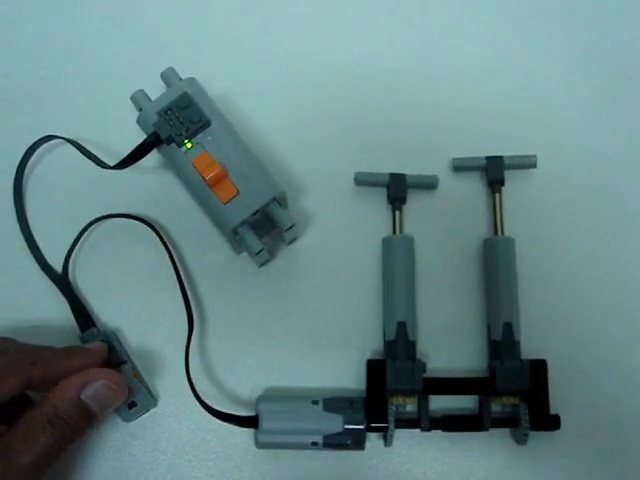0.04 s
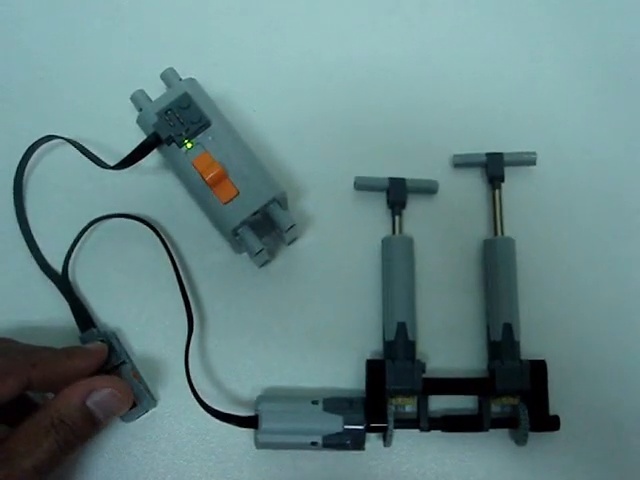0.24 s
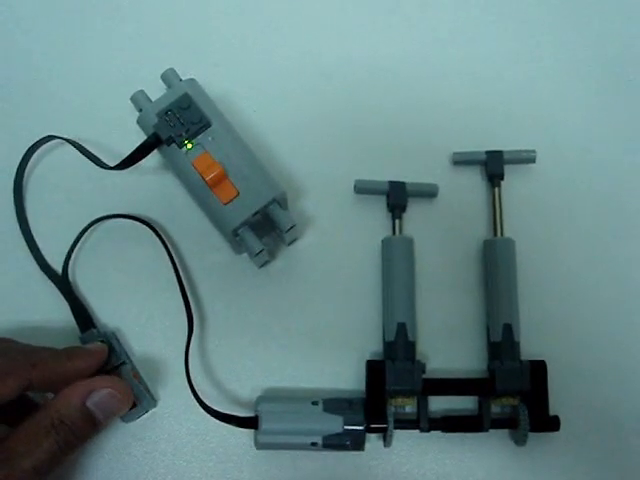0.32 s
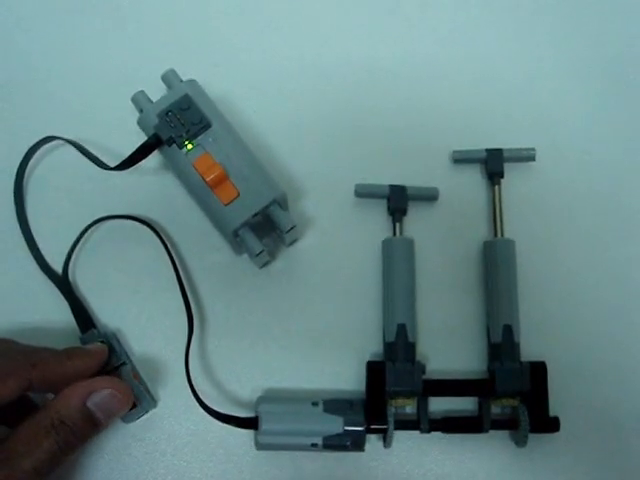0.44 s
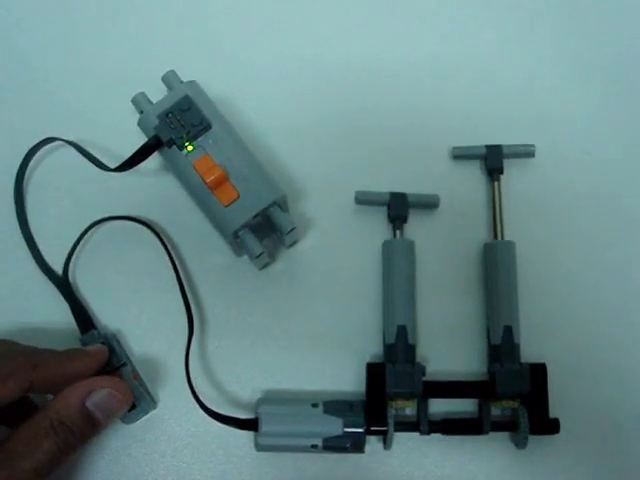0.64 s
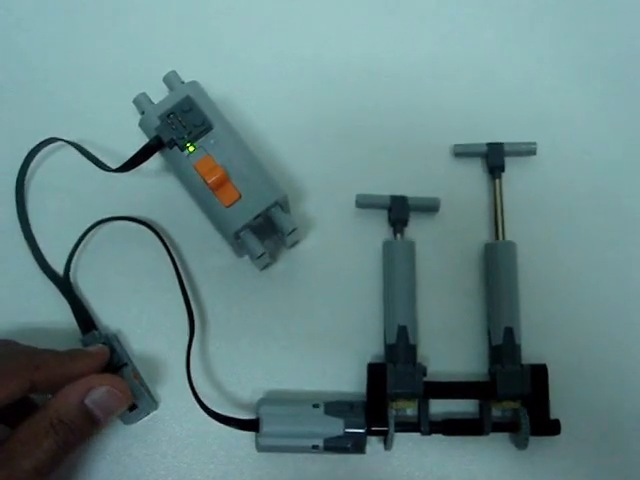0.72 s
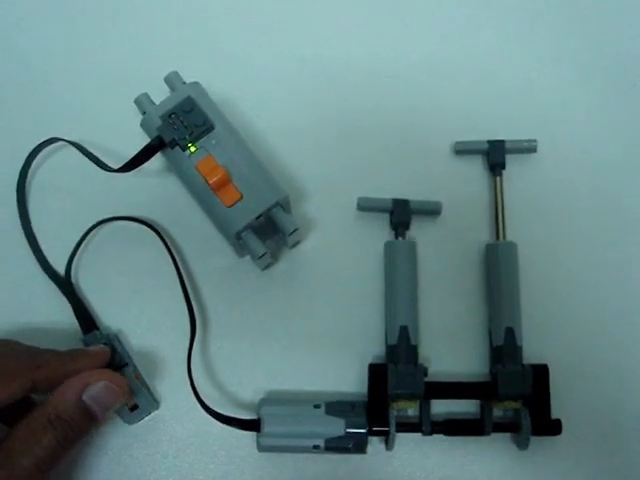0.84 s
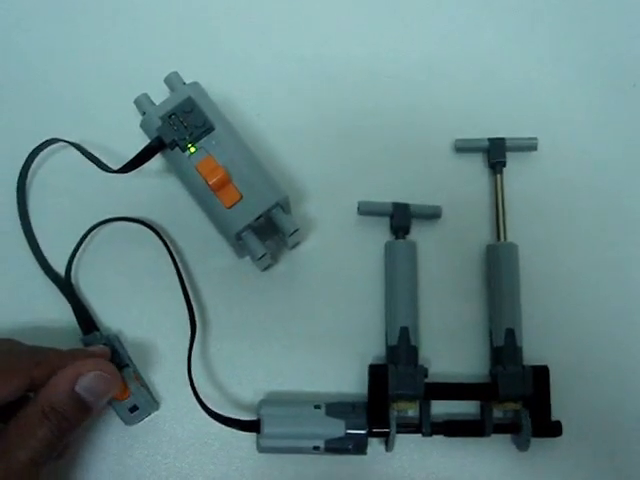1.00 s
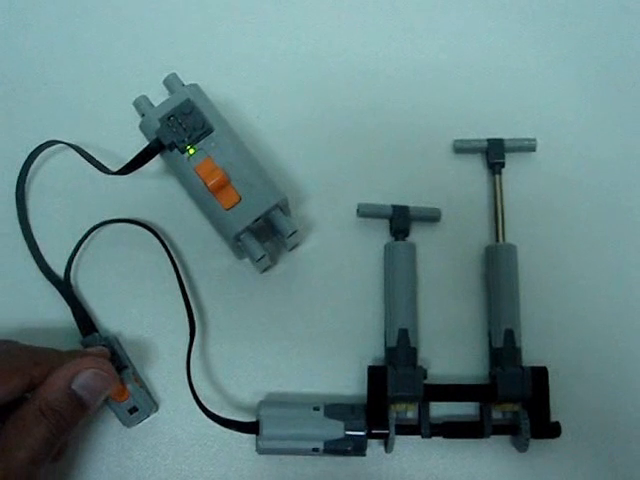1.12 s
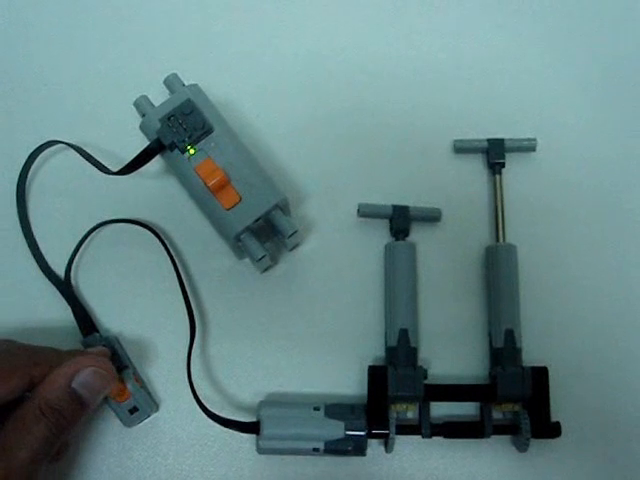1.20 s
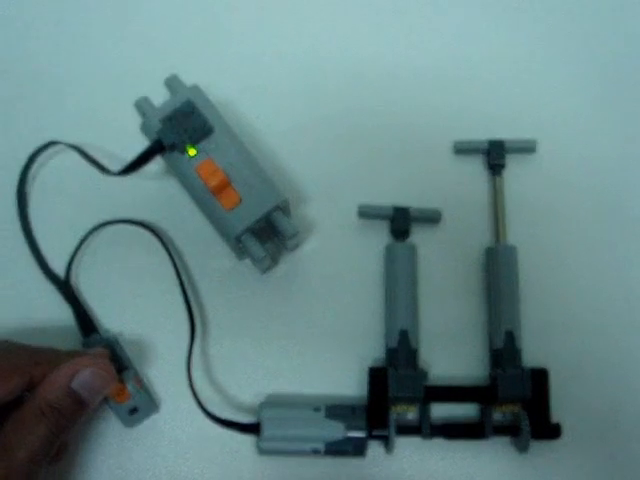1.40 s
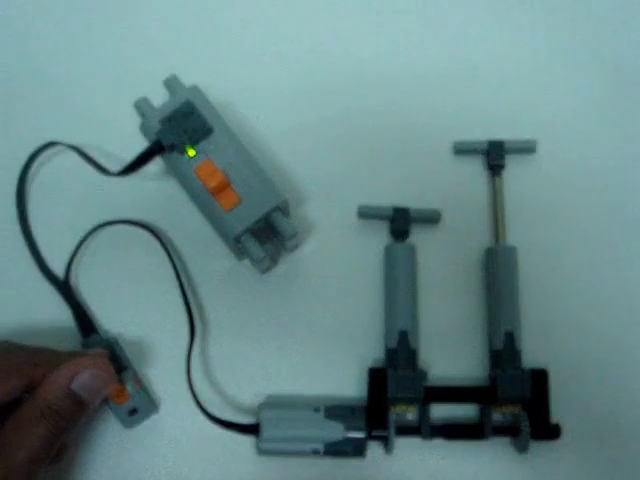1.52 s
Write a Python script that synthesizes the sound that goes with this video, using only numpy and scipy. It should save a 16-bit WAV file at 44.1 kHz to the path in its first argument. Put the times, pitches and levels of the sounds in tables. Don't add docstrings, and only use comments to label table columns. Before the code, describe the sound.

A small electric motor clicks on, whirs with a coarse plastic gear rattle and thin whine, strains with harder ticks, then cuts out and coasts to rest in a quiet hissing room, heard close up.

```python
import sys
import numpy as np
from scipy import signal
from scipy.fft import rfft, irfft
from scipy.io import wavfile
from scipy.ndimage import uniform_filter1d

SR = 44100
rng = np.random.default_rng(int(sys.argv[2]) if len(sys.argv) > 2 else 0)


def attenuation_scalar(level_db):
    decades = np.asarray(level_db, float) / 20
    return 10 ** decades


def generate_wav(sig):
    pcm = np.round(np.clip(np.atleast_2d(sig).T, -1, 1) * 32767).astype(np.int16)
    wavfile.write(sys.argv[1], SR, pcm)


N = 68355
T = np.arange(N) / SR

SHAFT_HZ, START_S, STOP_S = 134.65, 0.22, 1.04
TOOTH_PER_TURN = 5 / 9


def evened(x):
    return x / np.sqrt(np.mean(x ** 2) + 1e-20)


def colour(x, points):
    hz = np.fft.rfftfreq(N, 1 / SR)
    point_hz, point_db = np.transpose(points)
    gain_db = np.interp(np.log(hz + 1), np.log(point_hz + 1), point_db)
    return evened(irfft(rfft(x) * attenuation_scalar(gain_db), N))


def resonate(x, hz, width):
    return signal.lfilter(*signal.iirpeak(hz, hz / width, SR), x)


def drift(seconds):
    size = max(int(seconds * SR), 2)
    return evened(uniform_filter1d(uniform_filter1d(rng.standard_normal(N), size), size))


def body(x, modes, strain=0):
    total = np.zeros(N)
    for hz, width, db, *strain_db in modes:
        ring = resonate(resonate(x, hz, width), hz, 2 * width) / np.sqrt(width)
        total = total + attenuation_scalar(db + strain * sum(strain_db)) * ring
    return evened(total)


def shaft_turns():
    spin_up_s, coast_s, wander = 0.027, 0.3, 0.001
    rising = 1 - np.exp(-np.maximum(T - START_S, 0) / spin_up_s)
    coasting = np.exp(-np.maximum(T - STOP_S, 0) / coast_s)
    speed_hz = SHAFT_HZ * rising * coasting * (1 + wander * drift(0.018))
    return np.cumsum(speed_hz) / SR


# time in seconds, effort in dB, table contact in dB, frame brightness in dB.
DRIVE_COURSE = [
    (0.22, -57, 0, -21),
    (0.23, -37, -10, 4),
    (.272, -33, 1.5, -12.5),
    (.78, -31.5, -8, -1.5),
    (1.02, -28.5, 0.5, -6.5),
    (1.065, -34.5, -0.5, -13),
    (1.2, -37, 5.5, 1),
    (1.298, -50.5, 10.5, -9),
    (1.401, -63, -4, -18),
]


def drive():
    s, effort_db, contact_db, bright_db = np.transpose(DRIVE_COURSE)
    effort = attenuation_scalar(np.interp(T, s, effort_db, left=-120, right=-120))
    return effort, np.interp(T, s, contact_db), np.interp(T, s, bright_db)


def teeth(turns):
    tooth_db, tooth_s, flicker_db = 3, 0.0033, 0.36
    ticks_per_s, tick_spread_db, tick_db, tick_cycles = 1200, 2, -9.5, 3.4
    since_s = (turns * TOOTH_PER_TURN) % 1 / (SHAFT_HZ * TOOTH_PER_TURN)
    jump = attenuation_scalar(tooth_db * np.exp(-since_s / tooth_s) + flicker_db * drift(0.0045))
    strength = attenuation_scalar(tick_spread_db * np.minimum(rng.exponential(1, N), 3.5))
    hits = (rng.random(N) < ticks_per_s / SR) * strength * jump

    pitches_hz = np.geomspace(500, 5500, num=16)
    kind = rng.integers(0, len(pitches_hz), N)
    t = T[:900]
    ticks = np.zeros(N)
    for k, hz in enumerate(pitches_hz):
        tick = hz * np.exp(-t * hz / tick_cycles) * np.sin(2 * np.pi * hz * t)
        ticks += signal.oaconvolve(hits * (kind == k), tick)[:N]
    scrape = evened(jump * rng.standard_normal(N))
    return scrape + attenuation_scalar(tick_db) * evened(ticks)


# frequency in Hz, level in dB per Hz.
GEAR_SPECTRUM = [(35, -31), (60, -27.5), (129, -19), (314, -12), (397, -2.5), (607, -7.5), (675, -10.5),
                 (4190, -9), (9600, -22.5), (12500, -108), (21100, -120)]


def gears(rattle):
    return colour(rattle, GEAR_SPECTRUM)


# frequency in Hz, width in Hz, level in dB.
FRAME_MODES = [(1726, 450, -9.5), (2835, 100, -13), (3710, 99, -12), (4330, 300, -5), (4760, 280, -5.5),
               (6070, 360, -12)]


def frame(rattle, bright_db):
    return attenuation_scalar(-9 + bright_db) * body(rattle, FRAME_MODES)


# frequency in Hz, width in Hz, level in dB, gain under strain in dB.
TABLE_MODES = [(129, 48, -32, 16), (192, 11, -12, -4), (252.6, 26, -10, -0.5), (375.4, 63, -3, 3),
               (461, 40, -6, 1), (565.5, 53, -7, 6.5), (682, 75, -5.5, 8.5), (755.5, 95, -3, 6),
               (904, 210, -6, 2.5), (956, 110, -8, 6), (1091, 260, -0.5, 1.5), (1390, 770, -13, 9)]


def table(rattle, contact_db):
    strain_s, strain_rise_s = 0.72, 0.18
    strain = np.clip((T - strain_s) / strain_rise_s, 0, 1)
    level_db = -7.5 + contact_db + 1.2 * drift(0.037)
    return attenuation_scalar(level_db) * body(rattle, TABLE_MODES, strain)


def chirps(turns):
    pitch_hz, width_hz, level_db, spread_db = 5150, 400, -19, 3
    hit = np.diff(np.floor(turns * TOOTH_PER_TURN), prepend=0)
    size = attenuation_scalar(spread_db * rng.standard_normal(N)) * rng.choice([-1, 1], N)
    ring = resonate(resonate(hit * size, pitch_hz, width_hz), pitch_hz, 3 * width_hz)
    return attenuation_scalar(level_db) * evened(ring)


def rumble():
    return attenuation_scalar(-38.5) * evened(resonate(rng.standard_normal(N), 45, 60))


SHAFT_ORDERS = [1.8, 3, 5, 7, 15, 30, 35]
# level in dB, level change over the run in dB.
ORDER_LEVELS = [(-57.5, -3.5), (-42.5, -6.5), (-53, 3.5), (-64.5, 15.5), (-49, 0), (-44, 1), (-57.5, 0)]


def whine(turns):
    rise_s, fall_s, waver_db = 0.13, 0.025, 1.6
    rise = np.clip((T - START_S) / rise_s, 0, 1)
    fall = np.exp(-np.maximum(T - STOP_S, 0) / fall_s)
    run = (T - START_S) / (STOP_S - START_S)
    tones = attenuation_scalar(-51.5 + drift(0.05)) * np.sin(2 * np.pi * turns)
    for order, (db, change_db) in zip(SHAFT_ORDERS, ORDER_LEVELS):
        level = attenuation_scalar(db + change_db * run + waver_db * drift(0.081))
        tones = tones + level * np.sin(2 * np.pi * (order * turns + rng.random()))
    tones = tones + attenuation_scalar(-70) * np.sin(2 * np.pi * 60 * turns)
    return np.sqrt(2) * rise * fall * tones


# start in seconds, peak in dB, pitch in Hz, T60 in seconds.
KNOCK_EVENTS = [(0.1371, -47, 2630, 0.044), (0.227, -40, 3770, 0.056), (0.2684, -23.5, 3720, 0.037),
                (0.3355, -25, 4010, 0.042), (0.6614, -27, 4030, 0.016), (0.8759, -22.5, 3860, 0.029),
                (0.9429, -18, 4320, 0.025), (1.0032, -19, 4060, 0.0175), (1.179, -40, 4790, 0.037),
                (1.2044, -31.5, 3750, 0.019), (1.2304, -36.5, 3460, 0.012), (1.2514, -37, 4230, 0.027),
                (1.4024, -43, 3790, 0.02), (1.4658, -46, 3230, 0.023)]


def knocks():
    out, t = np.zeros(N), T[:2500]
    for s, db, hz, t60 in KNOCK_EVENTS:
        width = 1.2 * hz
        burst = evened(resonate(resonate(rng.standard_normal(2500), hz, width), hz, width))
        attack = np.minimum(t / 0.001, 1)
        sound = burst * attenuation_scalar(db - 2.5 - 60 * t / t60) * attack
        part = out[round(s * SR):][:2500]
        part += sound[:len(part)]
    return signal.lfilter(*signal.butter(4, 6000, fs=SR), out)


# start in seconds, length in seconds, level in dB, pitch in Hz.
RUSTLE_EVENTS = [
    (.085, .075, -54, 1300),
    (1.4, .05, -58, 1200),
    (1.49, .045, -56, 1500),
]


def rustles():
    rub = rng.standard_normal(N) * attenuation_scalar(2.5 * drift(0.004))
    out = np.zeros(N)
    for s, length, db, hz in RUSTLE_EVENTS:
        swell = np.sin(np.pi * np.clip((T - s) / length, 0, 1))
        width = 2.2 * hz
        out += attenuation_scalar(db) * swell * evened(resonate(resonate(rub, hz, width), hz, width))
    return out


# frequency in Hz, level in dB per Hz.
ROOM_SPECTRUM = [(18, -63), (30, -36.5), (125, -5.5), (162, -10.5), (691, -9.5), (743, -11), (1360, -10.5),
                 (8110, -26), (9600, -32), (12500, -68), (21100, -120)]


def room():
    return attenuation_scalar(-55 + 1.3 * drift(0.022)) * colour(rng.standard_normal(N), ROOM_SPECTRUM)


def scene():
    effort, contact_db, bright_db = drive()
    turns = shaft_turns()
    rattle = teeth(turns)
    train = gears(rattle) + frame(rattle, bright_db) + table(rattle, contact_db) + chirps(turns) + rumble()
    return (effort * train + whine(turns) + knocks() + rustles() + room())[None]


def band_limit(x):
    return signal.sosfilt(signal.butter(12, 17000, fs=SR, output="sos"), x)


def record(dry):
    band = signal.firwin(1023, 9720, window=("kaiser", 11), fs=SR)[None]
    edge = signal.firwin(1023, 15740, window=("kaiser", 11), fs=SR)[None]
    low = signal.oaconvolve(dry, band, "same")
    held = np.repeat(low[:, ::2], 2, axis=1)[:, :N]
    mix = signal.oaconvolve(held, edge, "same")
    return band_limit(mix)


dry = scene()
out = record(dry)
generate_wav(out)
```